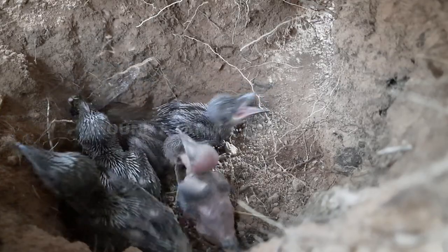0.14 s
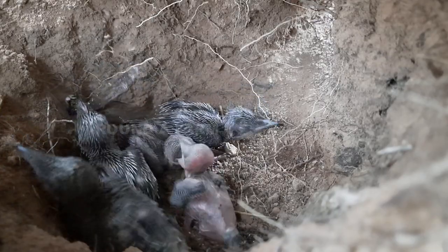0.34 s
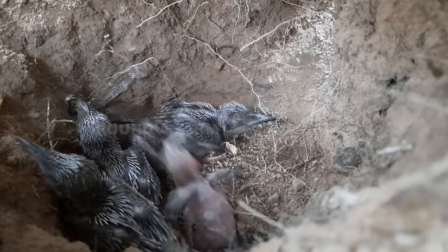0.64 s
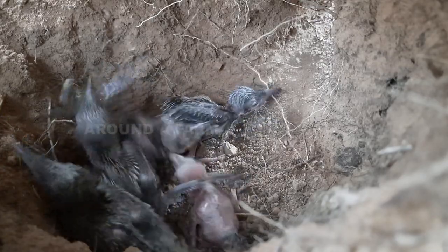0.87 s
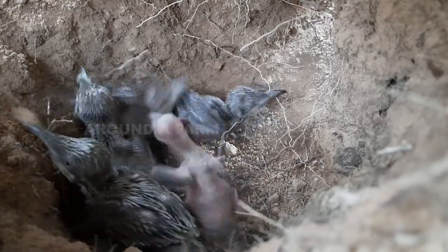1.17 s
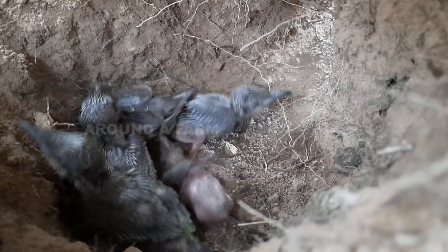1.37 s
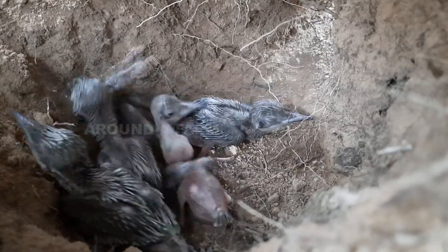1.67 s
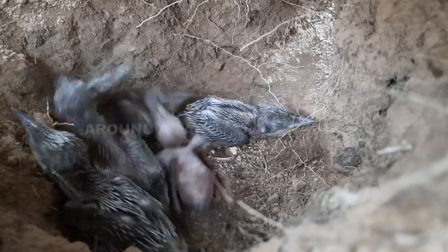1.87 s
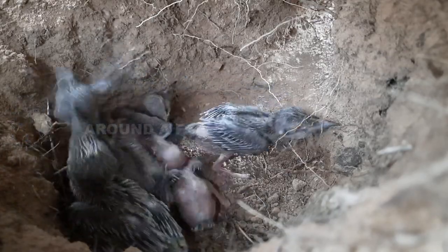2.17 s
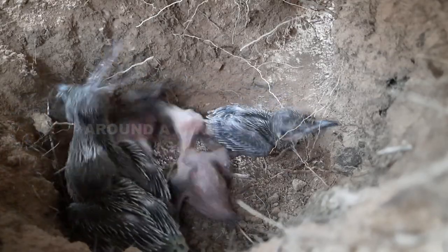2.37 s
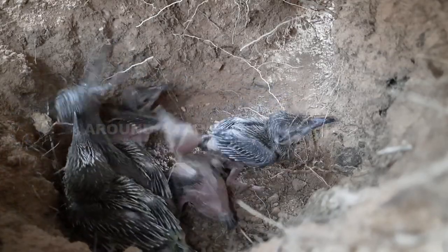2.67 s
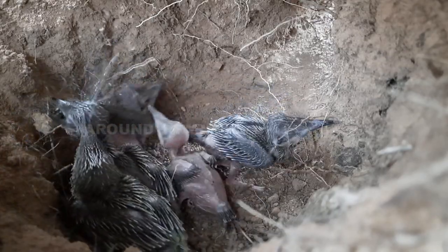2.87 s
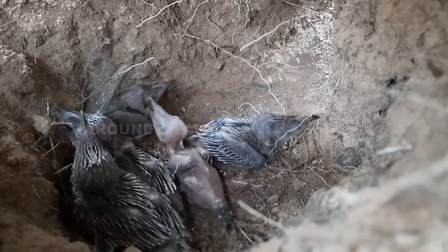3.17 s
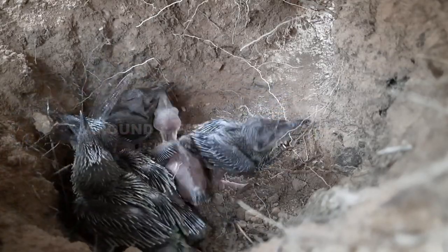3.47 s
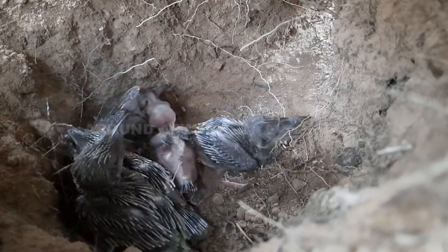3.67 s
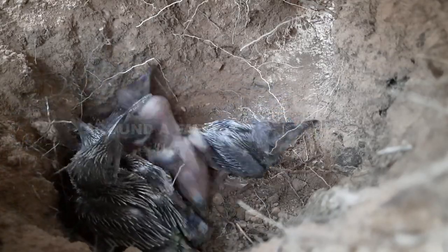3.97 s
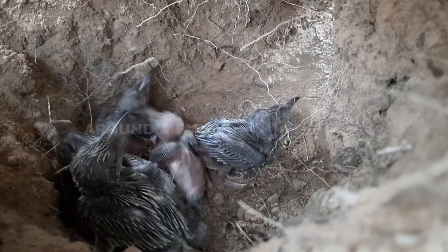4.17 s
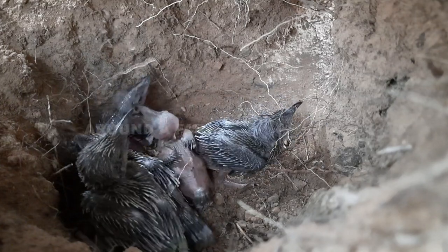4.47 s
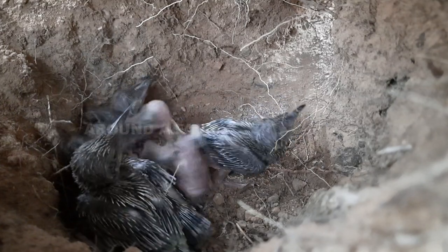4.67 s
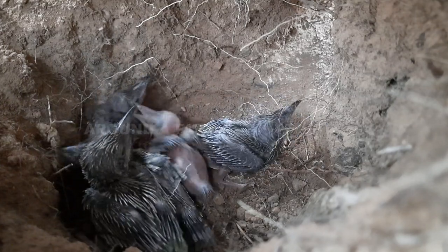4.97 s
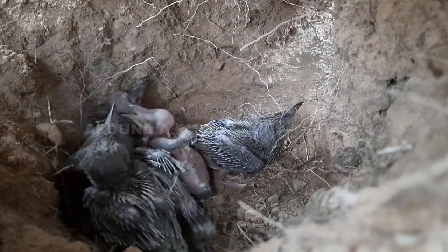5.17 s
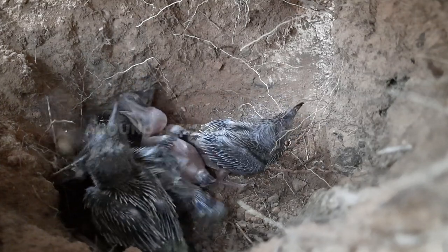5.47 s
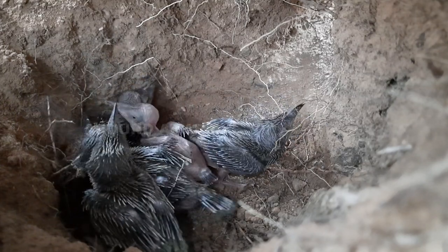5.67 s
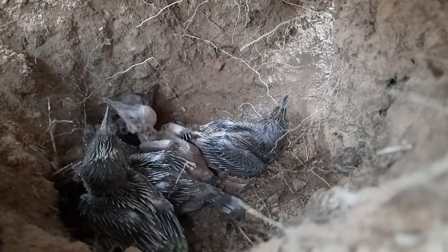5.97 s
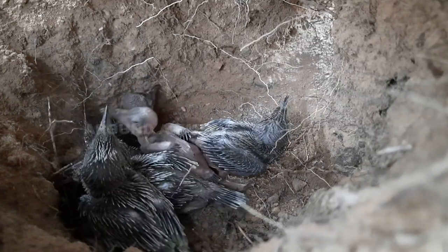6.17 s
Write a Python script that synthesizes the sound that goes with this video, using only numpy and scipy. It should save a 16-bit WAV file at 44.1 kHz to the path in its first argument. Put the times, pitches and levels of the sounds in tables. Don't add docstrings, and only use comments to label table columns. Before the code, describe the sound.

Young birds beg close to the microphone and left of centre in a tight, dry soil hollow. After a nearly quiet first second, sharp chirps come in quick succession, each a piercing peep with a buzzing, rattling tail. A clear chick and a rougher, croaky one overlap, pausing briefly around three and a half seconds, then calling louder to the end. Dry shuffles and tiny snaps accompany them over steady distant engine drone and thin insect hiss.

```python
import sys
import numpy as np
from scipy import signal
from scipy.fft import rfft, irfft, next_fast_len
from scipy.io import wavfile
from scipy.ndimage import uniform_filter1d

SR = 44100
rng = np.random.default_rng(int(sys.argv[2]) if len(sys.argv) > 2 else 0)


def voltage_ratio(decibels):
    exponent = np.asarray(decibels, float) / 20
    return 10 ** exponent


def master(y):
    cut = np.clip(np.atleast_2d(y).T, -1, 1)
    pcm = np.round(cut * 32767)
    wavfile.write(sys.argv[1], SR, pcm.astype(np.int16))


N = 279153

# top_s, top_hz, length_s, level_db, gape_db
BRIGHT_ARCHES = [(1.569, 3636, 0.066, -29.5, 30.5), (1.868, 3496, 0.053, -27, 30.5),
                 (2.168, 3580, 0.061, -26.5, 27), (2.463, 3514, 0.052, -26, 27),
                 (2.707, 3670, 0.078, -26.5, -20), (3.032, 3890, 0.047, -13.5, 4),
                 (3.318, 3560, 0.069, -26.5, 33), (4.095, 3460, 0.076, -27.5, 14.5),
                 (4.412, 3790, 0.054, -29.5, 39.5), (4.684, 3310, 0.05, -29, 22.5),
                 (5.017, 3744, 0.059, -27, 31), (5.338, 3515, 0.055, -20.5, 16),
                 (5.649, 3330, 0.041, -20.5, 24.5), (5.987, 3490, 0.062, -15, 1),
                 (6.29, 3443, 0.058, -14, 0)]
HOARSE_ARCHES = [(6.305, 3340, 0.051, -15, -24), (1.296, 3560, 0.044, -24.5, 4),
                 (1.72, 3830, 0.069, -23.5, 1), (2.005, 2500, 0.05, -24, 20), (2.308, 3680, 0.072, -23, 2),
                 (2.728, 3680, 0.07, -22, 3), (3.672, 3330, 0.058, -25, -8), (4.021, 3280, 0.048, -23, 2),
                 (3.311, 3400, 0.0378, -24, -8), (5.33, 3930, 0.062, -23.5, -6),
                 (5.662, 3405, 0.054, -19.5, 5)]
# top_s, top_hz, length_s, level_db, gape_db
PEEPS = [(0.94, 2970, 0.071, -40, 20.5), (1.174, 2820, .028, -40, 7), (2.113, 3300, .03, -60, 18),
         (2.262, 2920, 0.04, -37, 0), (2.977, 3400, 0.035, -41, 0), (3.265, 3700, 0.0287, -46, -3),
         (4.508, 4440, .007, -30, -10), (5.935, 4000, .008, -44, -10), (1.805, 2800, 0.068, -38, 23),
         (2.112, 2950, 0.049, -45.5, 37), (2.668, 2970, 0.037, -37, 26), (2.977, 2800, 0.099, -34, 5),
         (3.261, 2930, 0.069, -48, 35), (4.957, 2810, 0.095, -48, 12), (5.286, 2840, 0.047, -38, 4)]
# top_s, top_hz, length_s, level_db, gape_db
LEAD_INS = [(2.145, 3760, 0.008, -49, 38), (3.299, 3960, 0.016, -34.5, 15), (3.631, 3760, 0.055, -41.5, -5),
            (3.979, 3600, 0.05, -40.5, 6), (4.197, 3900, 0.01, -52, 38), (4.386, 3900, 0.011, -42, 36),
            (5.898, 3830, 0.064, -34, 0), (6.258, 3660, 0.029, -30, 6)]
# top_s, top_hz, length_s, level_db, gape_db
FALLS = [(.961, 2440, .02, -41, 15), (1.245, 3790, 0.079, -29.5, 26), (1.953, 2400, .052, -20.5, -15),
         (2.507, 2375, 0.025, -23, -11), (4.543, 4020, 0.12, -24, -35), (5.961, 3760, .013, -16, -11),
         (5.868, 2650, 0.02, -19, -1), (6.312, 2470, .018, -14.5, -4)]
# top_s, top_hz, length_s, level_db, gape_db
SPIKES = [
    (4.508, 3680, 0.04, -21, -1),
    (5.936, 3640, 0.052, -16, -2),
]
# top_s, top_hz, length_s, level_db, gape_db
CLIMBS = [
    (1.23, 4370, 0.032, -34, 31.2),
]
ARCH_RISE, LEAD_IN_RISE, FALL_RISE, SPIKE_RISE, CLIMB_RISE = .41, .76, .04, .54, .93
OPEN_GAPE_DB = 10
LANDING_HZ = 2500

PARTIALS_DB = [-0.5, -23, -30, -22.5, -43]
# centre_hz, width_hz, share_db
GAPE = [(7390, 867, -0.68), (5800, 792, -3.5), (9320, 2500, -2), (12750, 1100, -3.5)]
OVERTONES_DB = [10, 13.5, 10.5, 3.5, 0, -25, -7.5, -10, 4, 18.5, -3, 11, -9, -18, -13]
CLIMB_REACH_DB, HOARSE_REACH_DB = 20.5, -10
# frequency_hz, level_db per Hz
BREATH = [(3000, -3), (5500, -10), (7000, -4), (8300, 16.5), (9300, -15), (11500, -17), (13500, -22),
          (15900, -27)]

# start_s, length_s, first_partial_db, second_partial_db, gape_ring_db
BRIGHT_TRILLS = [(.002, 0.089, -71, -87, -90), (0.258, 0.13, -79.5, -77, -90),
                 (0.973, 0.188, -52.5, -68.5, -61), (1.303, 0.16, -46, -58.5, -44),
                 (1.611, 0.16, -52, -54.5, -38), (1.895, 0.18, -49.5, -55, -47),
                 (2.209, .16, -53.5, -59.5, -37.5), (2.481, 0.15, -50.5, -57, -53),
                 (2.756, 0.18, -45, -61.5, -58), (3.05, 0.17, -49, -53.5, -39),
                 (3.343, .14, -40, -61.5, -40), (4.045, 0.062, -44, -54, -58),
                 (4.11, 0.2, -58, -62.5, -36.5), (4.439, 0.14, -66, -63.5, -38.5),
                 (4.722, 0.19, -49.5, -63.5, -56), (5.049, .19, -52.5, -67, -35),
                 (5.355, 0.2, -44.5, -59.5, -38), (5.677, 0.18, -35.5, -57, -65),
                 (6.015, 0.18, -37, -59, -63)]
# first_hz, third_way_hz, two_thirds_hz, last_hz, throb_depth (0-1)
BRIGHT_TUNES = [(2700, 2700, 2650, 2900, 0.47), (2700, 2720, 2750, 2950, .6),
                (2440, 2400, 2330, 2450, 0.28), (2450, 2450, 2800, 2850, 0.4),
                (2450, 2550, 2900, 2510, 0.9), (2500, 2250, 2600, 2650, 0.6),
                (2400, 2450, 2480, 2560, 0.92), (2400, 2400, 2550, 2720, 0.74),
                (2400, 2400, 2480, 2300, 0.9), (2420, 2450, 2480, 2700, 0.6), (2400, 2420, 2480, 2450, 0.4),
                (2320, 2250, 2000, 2500, 0.7), (2520, 2600, 2750, 2720, 0.7),
                (2550, 1400, 3000, 2600, 0.87), (2400, 2200, 2450, 2700, 0.96),
                (2500, 2550, 2600, 2585, 0.29), (2480, 2450, 2600, 2470, 1), (2400, 2450, 2550, 2650, 0.59),
                (2400, 2450, 2520, 2400, 0.59)]
# start_s, length_s, tone_db, rasp_db, deep_rasp_db
HOARSE_TRILLS = [(1.308, 0.063, -40, -49, -44), (1.35, 0.14, -56.5, -64, -50),
                 (1.739, 0.28, -38.5, -40.5, -38.5), (2.313, 0.2, -38, -37, -35.5),
                 (2.733, 0.505, -44.5, -36, -35), (3.331, .25, -40.5, -44, -37.5),
                 (3.686, 0.25, -41, -40, -50.5), (4.019, 0.051, -59, -42, -43),
                 (4.119, 0.186, -74, -47.5, -51.5), (4.46, 0.21, -60, -46, -44),
                 (4.577, .27, -37.5, -37.5, -36), (5.051, 0.22, -68, -69, -49.5),
                 (5.365, 0.49, -33, -35, -34.5), (5.954, 0.2787, -34.5, -35.5, -43)]
# first_hz, third_way_hz, two_thirds_hz, last_hz, throb_depth (0-1)
HOARSE_TUNES = [(2590, 2400, 2300, 2330, 0.47), (2020, 2000, 1950, 3500, 0.3),
                (2715, 2620, 2550, 2450, 0.8), (2500, 2500, 2200, 2420, 1), (2650, 2700, 2000, 2650, 0.99),
                (2260, 2100, 2320, 2470, 1), (2190, 2250, 2260, 2350, 0.6), (2420, 2600, 1800, 3400, 0.9),
                (2500, 2510, 2100, 3100, 0.76), (2470, 2000, 4300, 1800, 1), (2650, 2550, 2480, 2450, 0.7),
                (2440, 3100, 1300, 3400, 1), (2280, 2330, 2300, 2420, 0.8), (2210, 2300, 2340, 2450, 0.8)]
THROB_HZ = 115
THROB_SWELL = .72

# frequency_hz, level_db
LEFT_PORT = [(800, -13), (1800, 0.5), (2250, -2), (2620, 1.5), (3050, -1.5), (3700, 1.5), (4250, 2),
             (4900, 5.5), (6200, 4), (7500, 3), (9500, -14), (11500, -14), (15000, -7.5)]
RIGHT_PORT = [(800, -18), (1800, -8.5), (2250, -9), (2620, -0.5), (3050, -23.5), (3700, -1.5), (4250, -56),
              (4900, -15), (6200, 0), (7500, -16.5), (9500, -7.5), (11500, -23), (15000, -30)]
BURROW_DB, BURROW_T60_S = -14, .04
RIGHT_LAG, HOARSE_LAG = 9, 8
HOARSE_RIGHT_DB = .5

# start_s, hold_s, level_db
SHUFFLES = [(.005, 0.091, -55), (0.756, 0.041, -50), (0.907, 0.05, -41), (1.01, 0.009, -33.5),
            (1.209, 0.11, -32), (1.285, 0.213, -35.5), (1.543, 0.26, -35.5), (1.847, 0.061, -30),
            (1.924, 0.12, -34.5), (2.162, .15, -36), (2.43, 0.035, -47), (2.516, 0.037, -43),
            (2.59, 0.14, -42), (3.052, 0.028, -39.5), (3.187, .03, -49), (3.31, 0.18, -50),
            (3.552, 0.091, -46.5), (4.062, 0.021, -36), (4.206, 0.13, -40.5), (4.395, 0.15, -35),
            (4.569, 0.0078, -33), (4.667, 0.05, -33), (4.745, 0.12, -39), (4.99, 0.058, -44),
            (5.155, 0.2, -41.5), (5.313, 0.037, -32.5), (5.482, 0.11, -40), (5.616, 0.052, -38),
            (5.717, 0.23, -51), (4.9, .08, -52.5), (5.082, .06, -51), (5.39, .08, -56), (5.963, 0.055, -49),
            (6.06, 0.35, -79), (3.68, .3, -75)]
SHUFFLE_RISE_DB_PER_S, SHUFFLE_SAG_DB_PER_S, SHUFFLE_FALL_DB_PER_S = 907, 16, 402
STILL_DB = -83
# frequency_hz, level_db per Hz
RUSTLE = [(900, -9), (2500, 1.5), (3400, -1), (4100, -5), (5200, 2.5), (8300, 12), (10000, -8),
          (12500, 1.5), (14000, 0.5), (15900, -8.5)]
# start_s, peak_db
TICKS = [(0.0905, -63), (0.7828, -63), (1.1, -43), (1.2, -46), (4.303, -36), (5.638, -39), (3.296, -53),
         (1.4486, -65), (1.514, -66), (1.6, -39), (1.7, -46), (3.6, -53), (6.287, -46), (5.2, -49),
         (1.5, -28), (3.5433, -46), (3.6037, -35), (3.645, -37), (3.616, -42), (3.631, -46), (3.738, -56),
         (5.737, -50), (5.79, -50), (5.803, -51), (5.816, -50), (5.893, -40), (5.572, -52), (3.689, -43),
         (4.0043, -56), (4.0394, -56), (4.1584, -49), (6.7, -55)]

# frequency_hz, level_db per Hz
INSECTS = [(4300, -41), (4750, -4.5), (5300, -8), (6000, -2.5), (6600, -3.5), (7400, -7.5), (8500, -6),
           (9100, -30)]
INSECT_DB = [
    [-57],
    [-51],
]
# frequency_hz, level_db per Hz
HUSH = [(3000, -3.5), (8500, -3), (9500, -18), (11000, -8), (12500, -2.5), (15500, -3)]
TREBLE_HUSH_DB = -65

# frequency_hz, level_db per Hz
AIR = [(15, -88), (25, -46), (43, -10.5), (64, -7.5), (85, -3.5), (117, -11.5), (151, -11.5), (180, -12.5),
       (243, -11.5), (365, -31), (482, -37), (772, -41), (4200, -63), (5460, -100), (9240, -120)]
AIR_DB = -36
# frequency_hz, likeness (1 the same, 0 unrelated)
LIKENESS = [(60, 0.5), (180, 1.26), (550, 0.04), (1650, -0.35), (4970, -6.5), (15000, -2.7)]
# frequency_hz, difference_db
LEAN = [(60, 1.5), (180, 7), (550, -1.5), (1650, 8.5), (4970, -7), (15000, -15)]
# shaft_hz, order_1_db, order_2_db, order_3_db
ENGINES = [
    (75.0, -52, -49, -60),
    (75.77, -39.5, -43.5, -60),
    (78.35, -50, -70, -75),
]
# time_s, change_db
ENGINE_SWELL = [(0, 0), (.5, -2), (1, -1), (1.4, -3.5), (1.8, -2), (2.2, 0), (2.55, 0), (2.9, -1), (3.3, 1),
                (3.7, 1.5), (4, -1.5), (4.5, 0.5), (4.9, 2), (5.3, -4.5), (5.7, 0.5), (6, 2.5), (6.33, 2)]
ENGINE_TRIM_DB, BEAT_TOP_S = .5, .49


def at_hz(points, hz):
    table = np.array(points)
    return np.interp(np.log(np.maximum(hz, 1)), np.log(table[:, 0]), table[:, 1])


def coloured(x, gain):
    size = next_fast_len(N + SR // 4)
    hz = np.arange(size // 2 + 1) * SR / size
    return irfft(rfft(x, size) * gain(hz), size)[..., :N]


def rms_one(x):
    return x / np.sqrt(np.mean(x ** 2) + 1e-20)


def drift(rate_hz):
    return rms_one(coloured(rng.standard_normal(N), lambda hz: 1 / (1 + (hz / rate_hz) ** 2)))


def add(track, at_s, sound):
    i = round(at_s * SR)
    track[i:i + len(sound)] += sound[:N - i]


def all_whistles():
    kinds = [(BRIGHT_ARCHES + HOARSE_ARCHES + PEEPS, ARCH_RISE, .8, 2, .79),
             (LEAD_INS, LEAD_IN_RISE, .8, 2, .8),
             (FALLS, FALL_RISE, .98, 2, .5),
             (SPIKES, SPIKE_RISE, .72, .8, .55),
             (CLIMBS, CLIMB_RISE, .57, 1.1, 3.0)]
    rows = []
    for table, rise, start, up, down in kinds:
        for s, hz, length, db, gape in table:
            rows.append((s, hz, start * hz, rise * length, (1 - rise) * length, db, up, down, gape))
    others = len(rows) - len(OVERTONES_DB) - 1
    reach_db = OVERTONES_DB + [HOARSE_REACH_DB] * others + [CLIMB_REACH_DB]
    return [row[:-1] + (db, row[-1]) for row, db in zip(rows, reach_db)]


def whistles(table, flutter, wobble, breath):
    out = np.zeros(N)
    for top_s, top_hz, start_hz, rise_s, fall_s, level_db, up, bend, reach_db, gape_db in table:
        t = np.arange(-round(rise_s * SR), round(fall_s * SR)) / SR
        u = abs(np.where(t < 0, t / rise_s, t / fall_s))
        i = np.minimum(np.round((top_s + t) * SR).astype(int), N - 1)
        low_hz = max(start_hz, min(2450, .95 * top_hz))
        rising = top_hz - (top_hz - low_hz) * u ** up
        falling = top_hz - (top_hz - min(LANDING_HZ, .9 * top_hz)) * np.sin(np.pi / 2 * u ** bend) ** 2
        unsteady = 1 + .006 * wobble[i] + .012 * flutter[::-1][i // 3]
        hz = np.where(t < 0, rising, falling) * unsteady
        phase = 2 * np.pi * np.cumsum(hz) / SR
        swell = voltage_ratio(level_db - np.where(t < 0, 6.0, 12.0) * u ** 1.6)
        swell = swell * np.clip((1 - u) * np.where(t < 0, 12.0, 5.0), 0, 1)
        sound = voltage_ratio(gape_db * .75 - 40) * breath[i]
        rasp = .022 * max(gape_db - 15, 0)
        for k, partial_db in enumerate(PARTIALS_DB, 1):
            lit = sum(voltage_ratio(db) * np.exp(-((k * hz - f) / width) ** 2) for f, width, db in GAPE)
            shake_db = (1.8 + .02 * max(gape_db, 0) + .04 * gape_db * lit) * flutter[i]
            extra_db = reach_db * (k > 2) + .3 * min(reach_db, 0) * (k == 2)
            gape_boost_db = gape_db * lit * (.8 if k == 3 else 1)
            strength = voltage_ratio(partial_db + extra_db + gape_boost_db + shake_db)
            sound = sound + strength * np.sin(k * phase + rasp * lit * wobble[i])
        add(out, top_s + t[0], swell * sound)
    return out


def trill(start_s, length_s, tune, dip, wobble):
    t = np.arange(round(length_s * SR)) / SR
    slow = wobble[np.minimum(round(start_s * SR) + np.arange(len(t)), N - 1)]
    turn = rng.random() + np.cumsum(THROB_HZ * (1 + .06 * slow)) / SR
    which = turn.astype(int) % 99
    depth, part = np.clip(tune[4], 0, 1), turn % 1
    ramp = np.minimum(part / THROB_SWELL, (1 - part) / (1 - THROB_SWELL))
    throb = 1 - depth * (1 - np.sin(np.pi / 2 * ramp) ** 2)
    strength = voltage_ratio(2.5 * depth * rng.standard_normal(99))[which]
    flick = np.clip((t - length_s + .019) / .019, 0, 1)
    line = np.interp(3 * t / length_s, range(4), tune[:4])
    line = uniform_filter1d(line, size=len(t) // 6, mode="nearest")
    hz = line * (1 - dip * (1 - throb) ** 2 * (1 - flick)) * (1 - .2 * flick ** 2)
    hz = hz * (1 + depth * (.01 + .014 * t / length_s) * rng.standard_normal(99)[which])
    edges = np.clip(np.minimum(t / .00066, (length_s - t) / .0061), 0, 1)
    gate = np.maximum(throb * strength, 1.43 * flick)
    return gate, 2 * np.pi * np.cumsum(hz) / SR, edges, turn


def bright_trills(wobble, flutter, breath):
    out = np.zeros(N)
    for (start_s, length_s, first_db, second_db, ring_db), tune in zip(BRIGHT_TRILLS, BRIGHT_TUNES):
        gate, phase, edges, _ = trill(start_s, length_s, tune, .04, wobble)
        here = slice(round(start_s * SR), round(start_s * SR) + len(gate))
        left_s = np.arange(len(gate))[::-1] / SR
        shut = max(1 - tune[0] / tune[3], 0) * np.linspace(1, 0, len(gate))
        waver = voltage_ratio(2.5 * flutter[here])
        uneven = .7 * np.clip(tune[4], .2, 1) * flutter[::-1][here]
        phase = phase + uneven * np.clip(left_s / .03 - .5, 0, 1)
        first = voltage_ratio(first_db + 12.5) / np.sqrt(waver) * np.sin(phase)
        voice = waver * (voltage_ratio(second_db + 14.5) * np.sin(2 * phase) + first)
        third = (.52 * waver ** 2 + .26 * (left_s < .016)) * np.sin(3 * phase)
        ring = voltage_ratio(ring_db + 9.5 - 316 * shut) * (third + .81 * breath[here])
        add(out, start_s, edges * ((.13 + gate ** 1.4) * voice + (.4 + .5 * gate) * ring))
    return out


def hoarse_trills(wobble):
    out, slaps, deep = np.zeros((3, N))
    for (start_s, length_s, tone_db, rasp_db, deep_db), tune in zip(HOARSE_TRILLS, HOARSE_TUNES):
        gate, phase, edges, turn = trill(start_s, length_s, tune, .26, wobble)
        burst = .06 + np.minimum(gate, 1.3) ** 1.9
        tone = np.sin(phase) + .035 * np.sin(2 * phase)
        add(out, start_s, voltage_ratio(tone_db + 11) * edges * burst * tone)
        between = (.5 - .5 * np.cos(4 * np.pi * turn)) ** 2 * (1.3 - np.minimum(gate, 1))
        slap_hz = 900 + 1250 * (2 * turn % 1)
        slap_hz = slap_hz + 380 * rng.standard_normal(199)[(2 * turn).astype(int) % 199]
        sweep = np.sin(2 * np.pi * np.cumsum(slap_hz) / SR)
        age_s = np.arange(len(gate)) / SR
        swell = np.clip(age_s / .015, .4, 1) * np.clip((age_s[::-1] - .005) / .015, .05, 1)
        swell = swell * voltage_ratio(.8 * wobble[round(start_s * SR):][:len(gate)])
        rough = 1.9 * sweep + 2.0 * rng.standard_normal(len(gate))
        rasp = edges * swell * (.16 + between) * rough
        add(slaps, start_s, voltage_ratio(rasp_db + 7.0) * rasp)
        add(deep, start_s, voltage_ratio(deep_db + 9.5) * rasp)
    # frequency_hz, level_db
    throat = [(600, -35.5), (1000, -3.0), (1500, -6.0), (2100, -1.5), (2500, -4.0), (2750, 3.5),
              (3100, -0.5), (3500, -13), (5000, -15), (8000, -37)]

    def low(hz):
        return 1 / (1 + (hz / 1500) ** 6)

    slaps = coloured(slaps, lambda hz: voltage_ratio(at_hz(throat, hz)) * (1 - low(hz)))
    deep = coloured(deep, lambda hz: voltage_ratio(at_hz(throat, hz)) * low(hz))
    return out + slaps + deep


def burrow(bright, hoarse):
    t = np.arange(round(.1 * SR)) / SR
    scatter = rng.standard_normal((2, len(t))) * voltage_ratio(-60 * t / BURROW_T60_S) * (t > .001)
    scatter = voltage_ratio(BURROW_DB) * scatter / np.sqrt(np.sum(scatter ** 2, axis=1)[:, None])
    left = bright + hoarse
    right = np.roll(bright, RIGHT_LAG) + voltage_ratio(HOARSE_RIGHT_DB) * np.roll(hoarse, HOARSE_LAG)
    both = np.array([left, right]) + signal.fftconvolve(left[None], scatter, axes=1)[:, :N]
    return coloured(both, lambda hz: voltage_ratio(np.array([at_hz(LEFT_PORT, hz), at_hz(RIGHT_PORT, hz)])))


def shuffle_db():
    t, level = np.arange(N) / SR, np.full(N, float(STILL_DB))
    for s, hold_s, db in SHUFFLES:
        rise = SHUFFLE_RISE_DB_PER_S * np.maximum(s - t, 0)
        sag = SHUFFLE_SAG_DB_PER_S * np.maximum(t - s, 0)
        fall = SHUFFLE_FALL_DB_PER_S * np.maximum(t - s - hold_s, 0)
        level = np.maximum(level, db - rise - fall - sag)
    return level


def rustle():
    grains = rng.standard_normal((2, N)) * voltage_ratio(2.2 * drift(40) + 3.0 * drift(400))
    grains[1] += 1.12 * np.roll(grains[0], RIGHT_LAG)
    grains = rms_one(coloured(grains, lambda hz: voltage_ratio(at_hz(RUSTLE, hz))))
    fine = coloured(grains, lambda hz: hz > 10000)
    coarse = (grains - fine) * voltage_ratio(2.2 * drift(10) + 1.2 * drift(30))
    fine = fine * voltage_ratio(2.8 * drift(15) + 2.4 * drift(90) + np.array([[1.5], [-5]]))
    shuffling = (coarse + fine) * voltage_ratio(shuffle_db() + np.array([[-1.5], [-12]]))
    snaps, t = np.zeros(N), np.arange(500) / SR
    for at_s, peak_db in TICKS:
        burst = rng.standard_normal(500) * t / .0012 * np.exp(-t / .0012)
        add(snaps, at_s, voltage_ratio(peak_db + 4) * burst)
    snaps = coloured(snaps, lambda hz: voltage_ratio(at_hz(RUSTLE, hz)))
    return shuffling + snaps * voltage_ratio(np.array([[0], [-9.0]]))


def insects():
    throb = voltage_ratio(.54 * np.sin(2 * np.pi * np.cumsum(66.0 + 5.3 * drift(5.1)) / SR))
    chorus = coloured(rng.standard_normal((2, N)),
                      lambda hz: voltage_ratio(at_hz(INSECTS, hz)) * (hz > 3500) * (hz < 10000))
    hush = coloured(rng.standard_normal((2, N)), lambda hz: voltage_ratio(at_hz(HUSH, hz)))
    return voltage_ratio(np.array(INSECT_DB)) * throb * rms_one(chorus) + voltage_ratio(TREBLE_HUSH_DB) * hush


def air():
    def like(hz):
        return np.clip(at_hz(LIKENESS, hz), 0, 1)

    mid, side = rng.standard_normal((2, N))
    mid = coloured(mid, lambda hz: voltage_ratio(at_hz(AIR, hz)) * np.sqrt(1 + like(hz)))
    side = coloured(side, lambda hz: voltage_ratio(at_hz(AIR, hz)) * np.sqrt(1 - like(hz)))
    both = coloured(np.array([mid + side, mid - side]),
                    lambda hz: voltage_ratio(at_hz(LEAN, hz) * np.array([[.5], [-.5]])))
    return voltage_ratio(AIR_DB - 5.0) * rms_one(both)


def engines():
    out, t = np.zeros(N), np.arange(N) / SR
    swell_db = ENGINE_TRIM_DB + np.interp(t, *np.transpose(ENGINE_SWELL))
    for hz, *orders_db in ENGINES:
        for k, level_db in enumerate(orders_db, 1):
            strength = voltage_ratio(level_db + swell_db + .28 * drift(1.0))
            out += strength * np.sin(2 * np.pi * k * hz * (t - BEAT_TOP_S))
    return out


def scene():
    flutter, wobble, slow = drift(262), drift(106), drift(12.83)
    breath = rms_one(coloured(rng.standard_normal(N), lambda hz: voltage_ratio(at_hz(BREATH, hz))))
    rows = all_whistles()
    wide = [row for row in rows if row[-1] > OPEN_GAPE_DB]
    narrow = [row for row in rows if row[-1] <= OPEN_GAPE_DB]
    bright = whistles(wide, flutter, wobble, breath) + bright_trills(slow, flutter, breath)
    hoarse = whistles(narrow, flutter, wobble, breath) + hoarse_trills(slow)
    return burrow(bright, hoarse) + rustle() + insects() + air() + engines()


def low_pass(x):
    return signal.sosfilt(signal.butter(12, 15960, fs=SR, output="sos"), x)


def record(dry):
    rounded = .88 * np.tanh(dry / .88)
    return low_pass(coloured(rounded, lambda hz: hz < 15830))


dry = scene()
out = record(dry)
master(out)
```